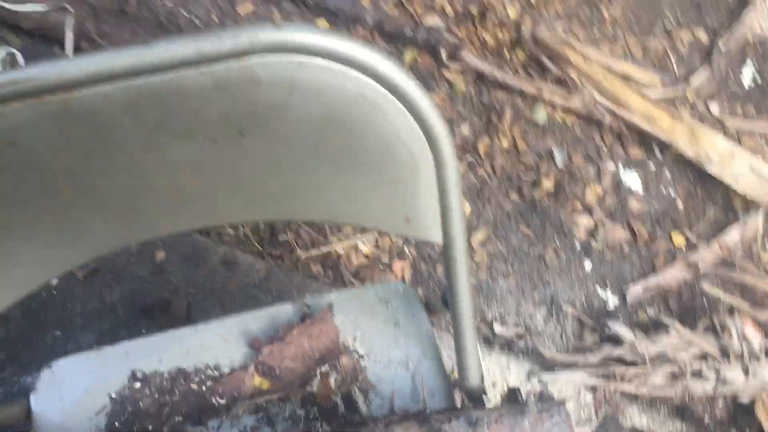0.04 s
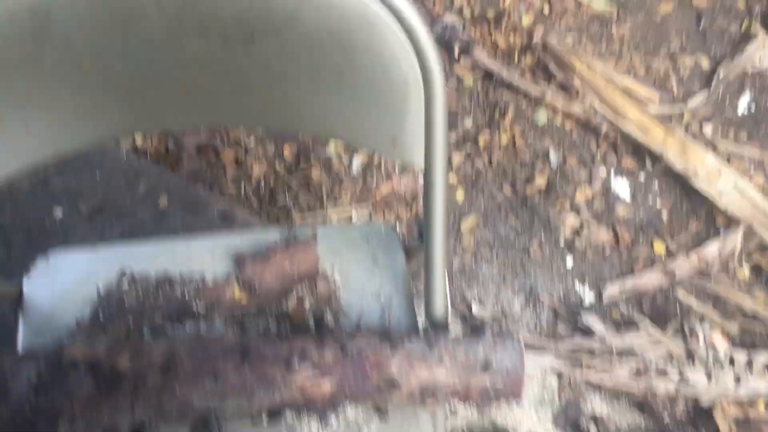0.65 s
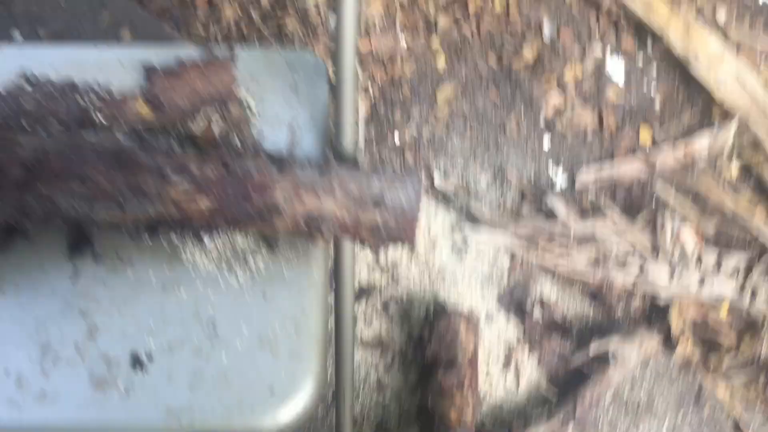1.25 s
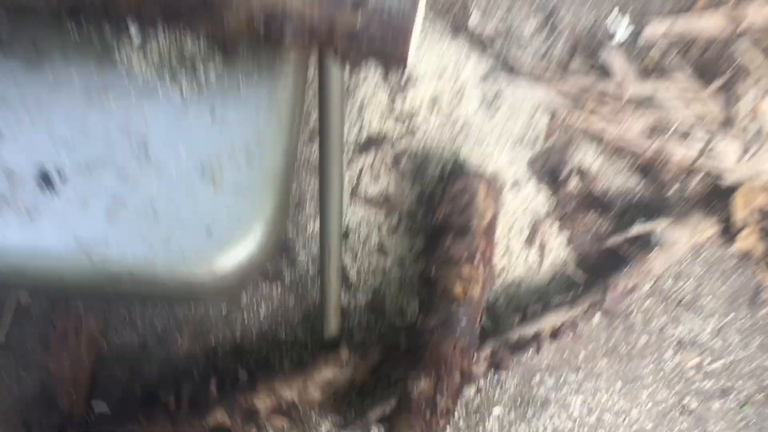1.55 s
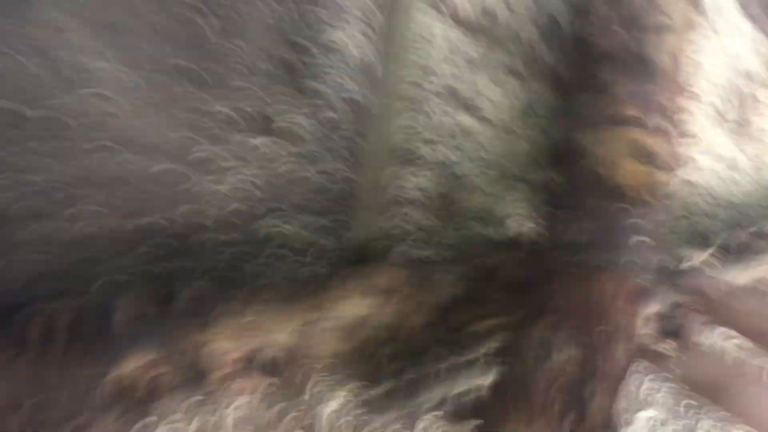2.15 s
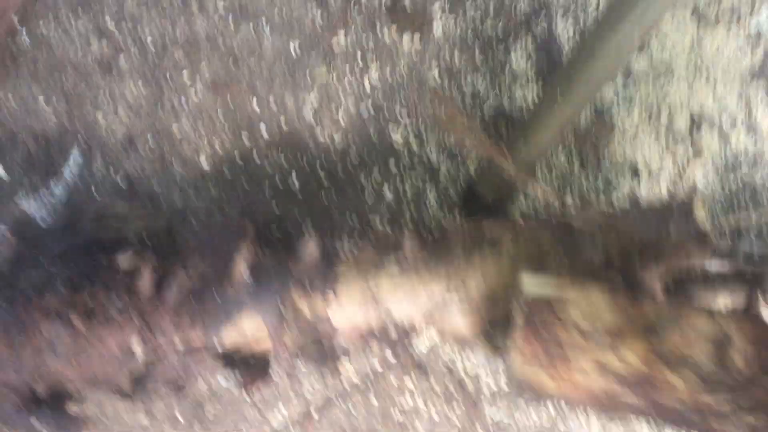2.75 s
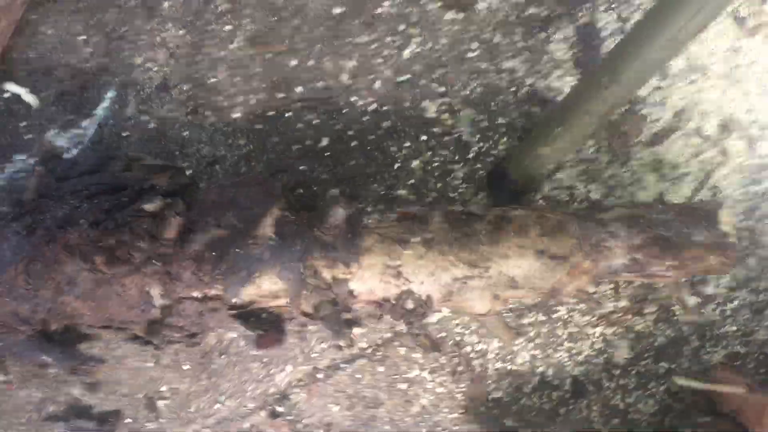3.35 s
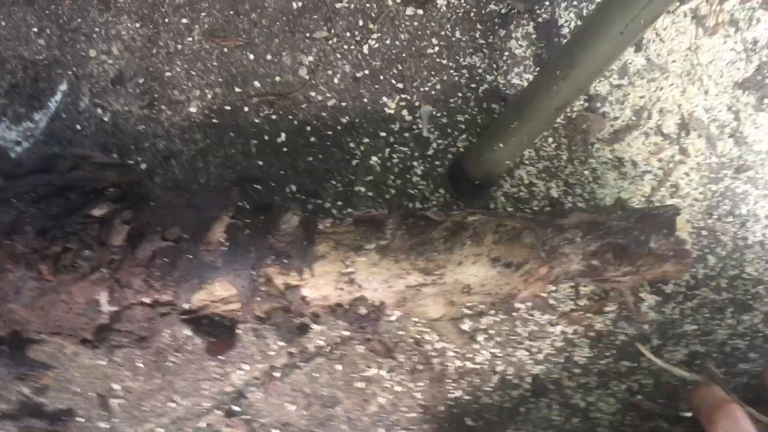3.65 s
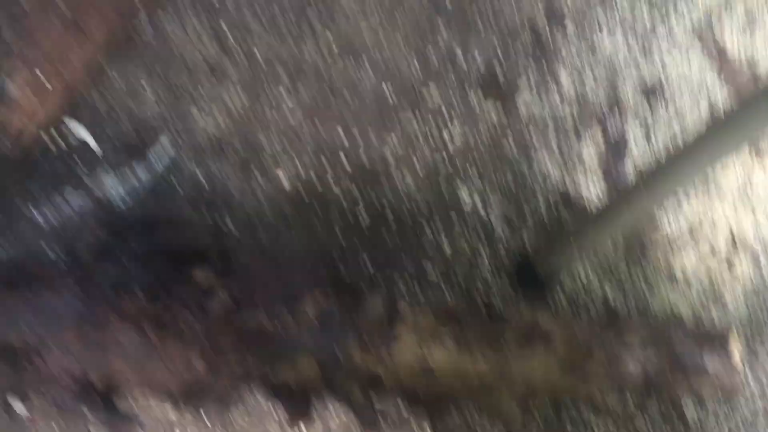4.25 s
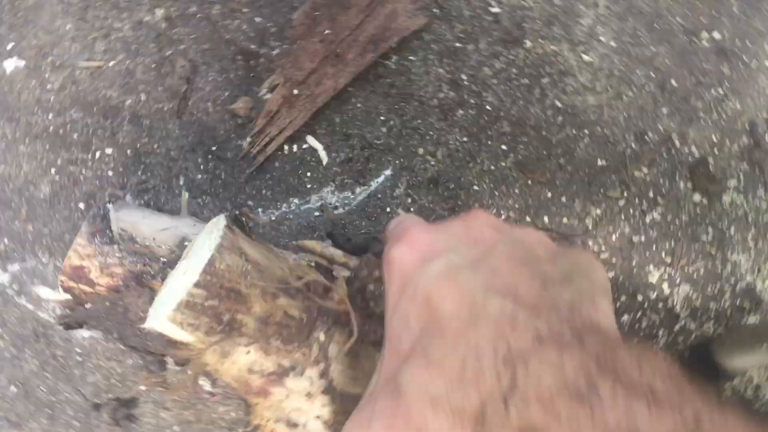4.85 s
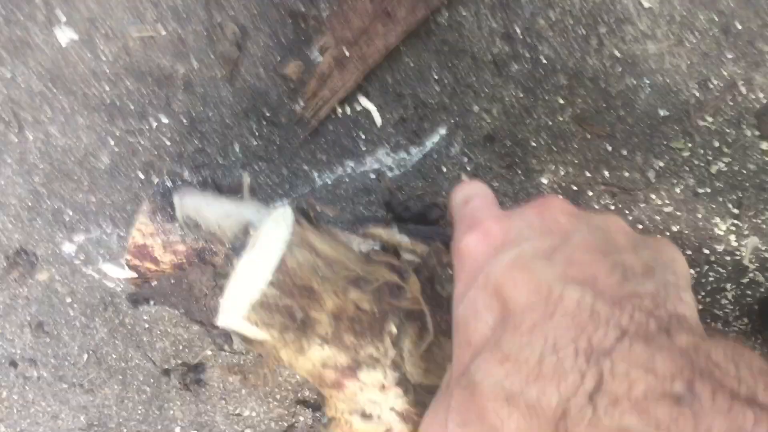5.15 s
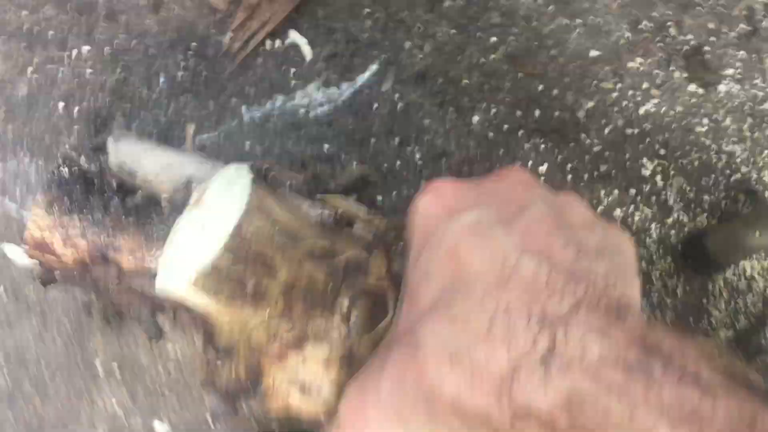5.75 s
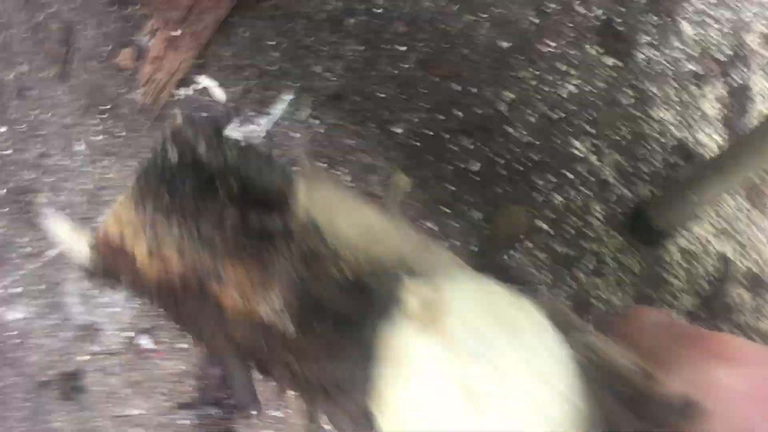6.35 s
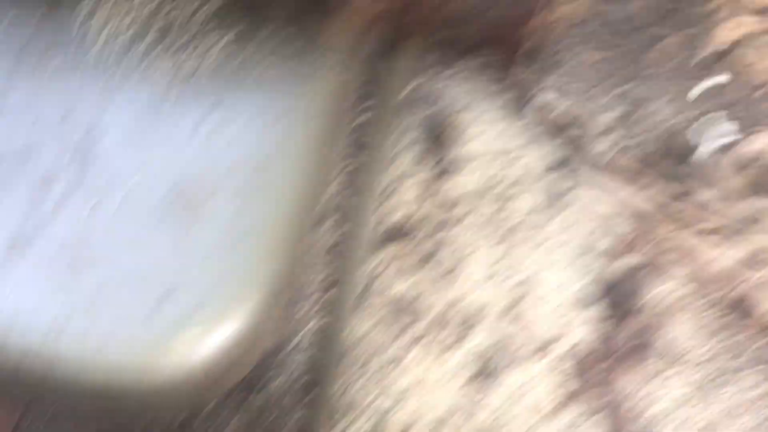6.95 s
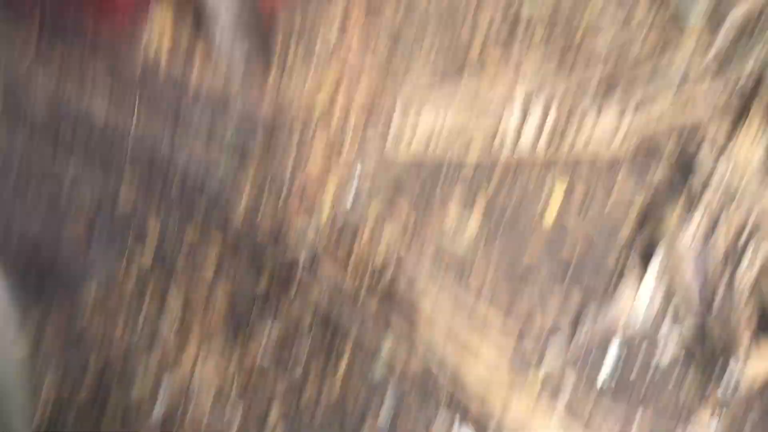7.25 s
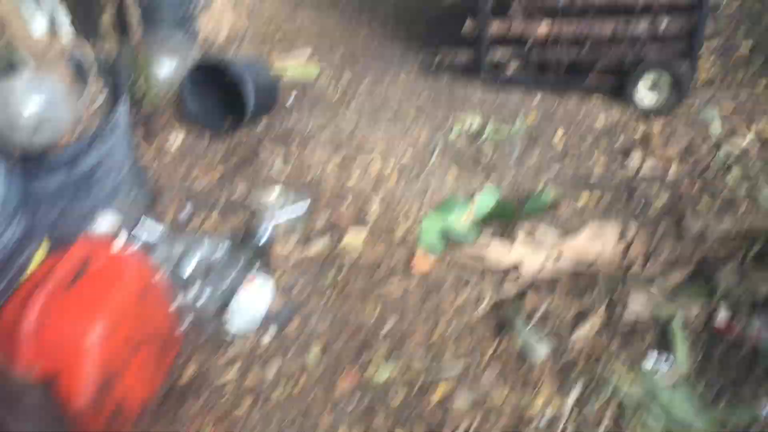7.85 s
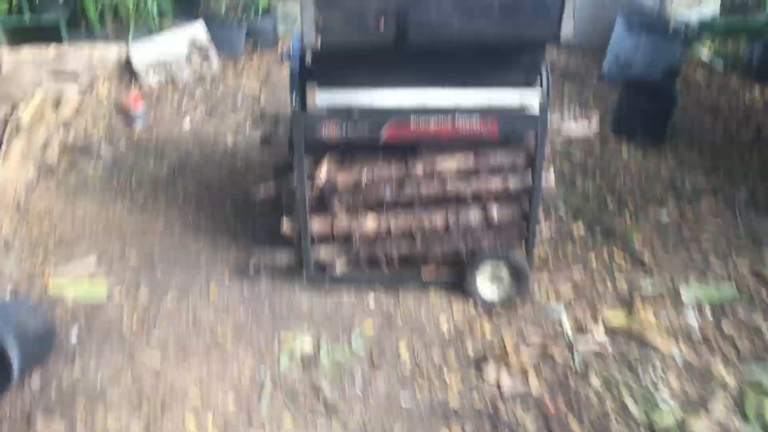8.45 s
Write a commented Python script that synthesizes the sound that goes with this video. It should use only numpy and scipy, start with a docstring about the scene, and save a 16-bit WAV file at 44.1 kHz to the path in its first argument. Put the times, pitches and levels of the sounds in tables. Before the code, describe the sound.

Outdoors over a faint low rumble, shoes scuff on gritty concrete. Close to the microphone, sawn logs are shifted with short, ringing wooden knocks, one of them loud, while bark scrapes and crackles. A log strikes a metal folding chair, which clangs and buzzes briefly. Bark creaks in the grip among lighter knocks, a splinter snaps, and a few faint steps crunch in dry leaves.

```python
"""A faint step in dry leaves, then shoes scuffing gritty concrete, outdoors over a low rumble.
Close to the phone microphone someone shifts sawn logs and picks one up: the wood rings briefly at
each knock, and its bark crackles as it drags and creaks in the grip. The log bumps a metal folding
chair, once loudly, so the steel rings and its loose joints buzz. Last come more steps in leaves."""
import sys
import numpy as np
from scipy import signal
from scipy.fft import rfft, irfft
from scipy.io import wavfile
from scipy.ndimage import uniform_filter1d

SR = 44100
rng = np.random.default_rng(int(sys.argv[2]) if len(sys.argv) > 2 else 0)


def persist_wave(psi):
    """Save psi, clipped to +-1, as 16-bit WAV."""
    counts = np.round(np.clip(psi, -1, 1) * 32767).astype(np.int16)
    wavfile.write(sys.argv[1], SR, np.atleast_2d(counts).T)


N = 375291
T = np.arange(N) / SR


def undb(db):
    """Decibels to gain."""
    return 10 ** (np.asarray(db) / 20)


def unit(x):
    """Scale to rms 1."""
    return x / np.sqrt(np.mean(x ** 2))


def add(out, s, x):
    """Mix x into out from time s on."""
    i = int(round(s * SR))
    x = x[max(-i, 0):max(N - i, 0)]
    out[max(i, 0):max(i, 0) + len(x)] += x


def colour(x, spectrum, tilt_db=0, ripple_db=0):
    """Filter by a spectrum, a tilt per octave and chance resonances; white noise keeps its power."""
    size = 4096
    octave = np.log2(np.maximum(np.arange(size // 2 + 1) * SR / size, 10))
    hz, db = np.transpose(spectrum)
    ripple = ripple_db * np.interp(octave, np.linspace(8, 14, 40), rng.standard_normal(40))
    tilt = tilt_db * np.maximum(octave, np.log2(hz[0]))
    gain = unit(undb(np.interp(octave, np.log2(hz), db) + tilt + ripple))
    cepstrum = irfft(np.log(gain))
    cepstrum[1:size // 2] *= 2  # minimum phase: nothing sounds ahead of an attack
    cepstrum[size // 2 + 1:] = 0
    return signal.fftconvolve(x, irfft(np.exp(rfft(cepstrum))))[:len(x)]


def resonate(x, hz, q):
    """One resonance, applied twice for steep skirts; rms 1."""
    b, a = signal.iirpeak(min(hz, SR / 2.5), max(q, 1), fs=SR)
    return unit(signal.lfilter(b, a, signal.lfilter(b, a, x)))


def wander(rate):
    """Smooth random drift with a spread near 1, taking `rate` new values a second."""
    hold = max(int(SR / rate), 1)
    stairs = np.repeat(rng.standard_normal(N // hold + 1), hold)
    return 1.3 * uniform_filter1d(uniform_filter1d(stairs, hold), hold)[:N]


def grains(n, rate, spread_db):
    """Tiny fractures of uneven size at random moments, `rate` a second; rms 1."""
    draw = rng.random(n) * SR / rate
    breaks = draw < 1
    size = np.full(n, 1e-9)
    size[breaks] = undb(spread_db * np.minimum(-np.log(draw[breaks]), 4))
    return unit(size * rng.standard_normal(n))


def ring(modes, weight, length=1, pitch=1):
    """Sum of decaying modes after a tap; length and pitch scale their decay times and frequencies."""
    hz, db, t60 = np.transpose(modes)
    out = np.zeros(int(.7 * SR))
    for f, gain, decay in zip(hz * pitch, undb(db) * weight, t60 * length):
        t = T[:min(int(2 * decay * SR), len(out))]
        out[:len(t)] += gain * np.exp(-np.log(1000) * t / decay) * np.sin(2 * np.pi * f * t)
    return out


# resonant bands of the rumble: f/Hz, level/dB
RUMBLE_BANDS = [(42, -14.5), (56, -9.5), (70, -1), (85, 2), (106, -7.5), (130, -3), (175, -12.5)]
# low swells as the microphone is swung about: t/s, crest level/dB, half length/s
RUMBLE_SWELLS = [(.85, -62, 0.17), (2.49, -53, 0.13), (3.199, -49.5, .17), (5.68, -53, 0.094),
                 (6.11, -53.5, 0.027), (6.97, -51.5, 0.048)]
def rumble(floor_db=-59.5):
    """A distant rumble whose bands rise and fall independently, with a few broad swells on top."""
    swell_power = sum(undb(db) ** 2 * np.exp(-((T - s) / half) ** 2) for s, db, half in RUMBLE_SWELLS)
    bands = 0
    for hz, db in RUMBLE_BANDS:
        bands += undb(db + 4 * wander(7)) * resonate(rng.standard_normal(N), hz, q=3)
    return np.sqrt(undb(floor_db) ** 2 + swell_power) * unit(bands)


# course of the background hum: t/s, level/dB
HUM_LEVELS = [(0, -78), (.8, -80), (1.6, -57.5), (3.5, -69), (4.5, -56.5), (6.2, -71), (7.7, -80),
              (8.5, -67.5)]
def hum(hz=157):
    """One low outdoor tone, wavering in level and pitch."""
    level_db = np.interp(T, *np.transpose(HUM_LEVELS)) + 2.5 * wander(12)
    phase = 2 * np.pi * np.cumsum(hz + 1.5 * wander(21)) / SR
    return undb(level_db) * np.sin(phase)


# spectrum of the open air: f/Hz, level/dB
AIR_SPECTRUM = [(120, -26), (200, -2.5), (305, -4.5), (328, -10.5), (519, -11), (671, -9.5), (968, -9),
                (1350, -15), (2050, -20.5), (8900, -29), (16000, -34)]
def air(db=-67.5):
    """A soft hiss all round the microphone, drifting with the breeze."""
    breeze_db = .7 * wander(1.2)
    return undb(db + breeze_db) * unit(colour(rng.standard_normal(N), AIR_SPECTRUM))


# spectrum of dry leaves: f/Hz, level/dB
LEAF_SPECTRUM = [(300, -10.5), (900, -1.5), (2300, 1), (4000, -2.5), (7000, -5.5), (10000, -10),
                 (15500, -14)]
def leaf_litter(db=-78.5):
    """Leaves on the ground nearby rustle faintly now and then."""
    stirring = undb(4 * wander(9))
    ticks = grains(N, rate=1600, spread_db=1.26) * stirring
    return undb(db) * unit(colour(ticks, LEAF_SPECTRUM, tilt_db=-2.5))


def footfalls(steps, spectrum, tilt_db, rate, spread_db):
    """A sole slides over many small grains; the rush swells and fades, differently at each step."""
    out, lead_s = np.zeros(N), .2
    t = T[:int(2 * lead_s * SR)] - lead_s
    for s, db, half_ms in steps:
        age = t * 1000 / half_ms
        trail = undb(-19.5) * np.exp(-np.maximum(age - .6, 2 * (.6 - age)) / 2)
        pressure = np.exp(-.74 * age ** 2) + trail
        rush = grains(len(t), rate, spread_db) * pressure
        add(out, s - lead_s, undb(db) * colour(rush, spectrum, tilt_db, ripple_db=2))
    return out


# steps in dry leaves: t/s, crest level/dB, half length/ms
LEAF_STEPS = [(.012, -52, 26.5), (7.828, -52, 8), (7.885, -55, 49), (7.968, -54, 66), (8.11, -61, 86),
              (8.496, -45.5, 11)]
def leaf_steps():
    """Dry leaves give way in fits under a shoe."""
    crunch = undb(2.5 * wander(110))
    return crunch * footfalls(LEAF_STEPS, LEAF_SPECTRUM, tilt_db=1.7, rate=5000, spread_db=-1.5)


# spectrum of grit on concrete: f/Hz, level/dB
GRIT_SPECTRUM = [(120, -15), (200, -7), (310, -4.5), (373, -9.5), (569, -1.5), (867, -9), (1000, -3.5),
                 (2020, -7), (2400, -10.5), (3430, -16.5), (8420, -31), (16000, -47.5)]
# scuffs round the chair: t/s, crest level/dB, half length/ms
SHOE_SCUFFS = [(.612, -42, 19.8), (.950, -56, 14.5), (1.388, -43.5, 10.2), (1.406, -33, 10.6),
               (1.431, -36, 15.2), (1.615, -67.5, 55), (1.757, -45, 15.6), (6.95, -67.5, 30),
               (7.50, -59, 9.3)]
def shoe_scuffs():
    """Shoes grind grit against the concrete, close by."""
    return footfalls(SHOE_SCUFFS, GRIT_SPECTRUM, tilt_db=3, rate=14000, spread_db=2.5)


# creaks as the log is gripped and turned: t/s, crest level/dB, resonance f/Hz
BARK_CREAKS = [(4.367, -55.5, 2640), (4.427, -55.5, 2120), (4.905, -48, 1830), (5.0, -52.5, 1690),
               (5.206, -54.5, 2044), (5.317, -50, 2090), (5.398, -37, 2070), (5.476, -46.5, 1630),
               (5.537, -42, 1670), (5.589, -46, 3240)]
def bark_creaks(half_s=.0087):
    """Short runs of stick and slip, each sounding one resonance of the bark."""
    out, lead_s = np.zeros(N), .1
    t = T[:int(2 * lead_s * SR)] - lead_s
    for s, db, hz in BARK_CREAKS:
        slips = resonate(grains(len(t), rate=770, spread_db=0), hz, q=2.6)
        add(out, s - lead_s, undb(db) * slips * np.exp(-(t / half_s) ** 2 / 2))
    return out


def fractures(cracks, spectrum):
    """Each crack is a quick cluster of breaking fibres with its own resonances, then trailing crumbs."""
    out, lead_s = np.zeros(N), .02
    t = T[:SR // 4] - lead_s
    crumbs = undb(-23) * (t > 0) * np.exp(-np.abs(t) / .012)
    for s, db, decay_ms, tilt_db in cracks:
        age = np.where(t < 0, -t * 2 / min(decay_ms, 5), t / decay_ms) * 1000
        fibres = grains(len(t), rate=26000, spread_db=4.5) * (np.exp(-age) + crumbs)
        add(out, s - lead_s, undb(db) * colour(fibres, spectrum, tilt_db, ripple_db=3))
    return out


# spectrum of dry flakes breaking: f/Hz, level/dB
FLAKE_SPECTRUM = [(300, -23), (900, -20.5), (2000, -3), (3300, -3), (4800, -4.5), (6500, -1.5), (9800, -3),
                  (12500, -5), (16000, -5)]
# cracks of bark and dry leaves: t/s, crest level/dB, decay/ms, tilt/(dB per octave)
SHARP_CRACKS = [(2.426, -35.5, 3.5, -6.5), (2.486, -31, 1.7, 11.5), (2.494, -39, 6.6, -1.5),
                (2.803, -42, 2, -6.5), (2.834, -24.5, 1.7, -3.5), (2.886, -35, 3.5, -6.5),
                (2.954, -30.5, 12.8, -4), (3.003, -35, 7.2, -4.5), (3.083, -38.5, 3.7, -1),
                (3.236, -39.5, 24, -4), (3.27, -32.5, 5.9, -10), (3.416, -33, 4.2, -9),
                (4.045, -45, 6.4, 2), (4.066, -29.5, 1.75, -3), (4.085, -38, 2.3, -3),
                (4.140, -38, 4.9, -7), (4.188, -41.5, 3.8, -4), (4.412, -42, 1.8, 5.5),
                (4.544, -34.5, 5, 1), (4.616, -31.5, 56, -6.5), (4.699, -29.5, 5.8, -4.5),
                (4.806, -37, 8.7, -7.5), (5.2567, -36.5, 2.3, 0.5), (5.351, -40, 7.9, -4.5),
                (5.386, -41, 12.5, -3), (5.536, -37.5, 24, -2), (6.128, -39.5, 7, -4),
                (6.477, -56, 2.1, -4), (6.742, -56.5, 1.8, -2.5), (7.811, -46.5, 1.4, -4),
                (8.082, -45.5, 6.8, -6), (8.251, -55, 1.34, -1)]
def sharp_cracks():
    """Close, sharp cracks of bark and, near the end, of dry leaves underfoot."""
    return fractures(SHARP_CRACKS, FLAKE_SPECTRUM)


# spectrum of a breaking splinter: f/Hz, level/dB
SPLINTER_SPECTRUM = [(500, -16), (2200, 1.5), (3100, 1), (3700, -7.5), (4700, -10), (5500, -8.5),
                     (6600, 0.5), (8000, -5), (10200, -8), (11300, 8), (13200, 3.5), (16000, -18.5)]
# snaps: t/s, crest level/dB, decay/ms, tilt/(dB per octave)
SPLINTER_SNAPS = [(2.8335, -23.5, 0.84, 1.5), (6.1405, -22, 3.9, 0), (6.146, -26, 2.15, -1)]
def splinter_snaps():
    """Splinters of dry wood break with a short, bright snap."""
    return fractures(SPLINTER_SNAPS, SPLINTER_SPECTRUM)


def bark_crackle():
    """Flakes of twelve sizes, large to small, crackle in their own short bursts at their own pitch."""
    out = 0
    for hz in np.geomspace(910, 14500, num=12):
        bursts = undb(4.5 * wander(70))
        out += np.sqrt(hz) * resonate(grains(N, rate=2000, spread_db=3.5) * bursts, hz, q=3.5)
    return colour(out, FLAKE_SPECTRUM)


# modes of a sawn log: f/Hz, level/dB, t60/s
LOG_MODES = [(103.5, -10, 0.52), (207, -19, 0.14), (268, -7, 0.056), (441, -17.5, 0.037),
             (502, -6.5, 0.039), (575, -1.5, .022), (775, 3, 0.024), (836, -5, 0.071), (906, -13.5, 0.023),
             (1252, -4.5, .028), (1350, -6.5, 0.017), (1860, -13.5, .025), (1934, 0, 0.033),
             (1960, -21, 0.044), (2335, -33.5, 0.022), (3040, -15, .032)]
LOG_HZ = np.transpose(LOG_MODES)[0]
def log_scrape(slips):
    """Small hard grains slip under the log and ring it, favouring its upper modes."""
    wood = ring(LOG_MODES, weight=1 / (1 + (2700 / LOG_HZ) ** 2), length=.8)
    return signal.fftconvolve(slips, wood / np.linalg.norm(wood))[:N]


def shove(length_s, attack_s, sag_db_per_s=25.5, release_s=.011):
    """The force of one shove takes hold quickly, weakens as it goes on and stops."""
    t = T[:SR] - attack_s
    after = np.maximum(t - length_s, 0)
    attack = np.clip(1 + t / attack_s, 0, 1) ** 2
    sag = undb(-sag_db_per_s * np.maximum(t, 0))
    settling = undb(-15) * np.exp(-after / .06)  # loose bark goes on settling
    return attack * sag * np.maximum(np.exp(-after / release_s), settling)


# shoves that drag the log: t/s, length/s, crackle level/dB, ring level/dB
LOG_SHOVES = [(2.364, 0.037, -45.5, -53.5), (2.415, 0.13, -56.5, -54), (2.601, 0.039, -51.5, -63),
              (2.671, 0.089, -64.5, -72), (2.821, 0.11, -54.5, -52), (3.018, 0.098, -58, -67.5),
              (3.137, 0.053, -48.5, -62), (3.204, 0.14, -49.5, -53), (3.355, 0.025, -48.5, -57),
              (3.425, .13, -57, -69), (3.589, .16, -63.5, -71.5), (3.789, 0.048, -59.5, -65),
              (3.898, 0.071, -61, -65), (4.154, 0.099, -53, -79), (4.515, 0.075, -50.5, -57),
              (4.857, 0.17, -60.5, -57.5), (5.237, 0.2, -58, -61.5), (5.466, 0.15, -54, -59),
              (5.575, 0.14, -57.5, -50), (5.71, 0.12, -62.5, -62), (5.885, 0.047, -61.5, -65.5),
              (5.967, 0.067, -60, -60), (6.07, .05, -66, -72)]
def log_drag(attack_s=.0066):
    """Bark catches and slips on the concrete: flakes crackle, lone crumbs snap and the log rings."""
    bark_gain, ring_gain = np.zeros(N), np.zeros(N)
    for s, length_s, bark_db, ring_db in LOG_SHOVES:
        force = shove(length_s, attack_s)
        add(bark_gain, s - attack_s, undb(bark_db) * force)
        add(ring_gain, s - attack_s, undb(ring_db) * force)
    catches = undb(2.5 * wander(70))
    crumbs = undb(-10.5) * colour(grains(N, rate=90, spread_db=.5), FLAKE_SPECTRUM)
    bark = unit(bark_crackle() * catches) + crumbs
    slips = unit(grains(N, rate=900, spread_db=1.5) * catches)
    return bark * bark_gain + log_scrape(slips * ring_gain)


# modes of the chair's sheet seat and tubes: f/Hz, level/dB, t60/s
CHAIR_MODES = [(150.3, -20, 0.58), (199, -4.5, 0.072), (251.2, 2, 0.2), (323, 4, 0.2), (431, -6.5, 0.17),
               (497, -15.5, 0.87), (646, -10.5, .2), (770, -23.5, 0.23), (822, 5, 0.3), (883, -6, .3),
               (988, -17.5, 0.87), (1147, -5.5, 0.39), (1207, -17.5, 0.72), (1374, -10.5, 0.45),
               (1534, -1, 0.25), (1555, -14.5, 0.57), (1637, -10.5, 0.53), (1737, -4, .22), (1816, 0, .25),
               (1857, -13, 0.57), (1880, -10, 0.29), (2208, -15, 0.77), (2327, -10, .28), (2620, -8, 0.22),
               (2760, -13.5, 0.14), (3380, -17.5, 0.2)]
# blows of the log: t/s, peak ring level/dB, contact corner f/Hz, relative buzz level/dB before trim
CHAIR_BUMPS = [(3.083, -36, 420, 17.5), (3.139, -39, 398, 10), (4.6140, -8.5, 3490, 2),
               (4.698, -33, 3500, 10)]
def chair_bumps(buzz_trim_db=-9, buzz_rise_s=.003):
    """The steel rings after a blow while its loose joints start to buzz and die away."""
    out, hz = np.zeros(N), np.transpose(CHAIR_MODES)[0]
    swing = (-1) ** np.arange(len(hz))  # neighbouring modes of a sheet swing opposite ways
    for s, db, corner_hz, buzz_db in CHAIR_BUMPS:
        steel = ring(CHAIR_MODES, weight=swing / (1 + (hz / corner_hz) ** 2))
        steel /= np.abs(steel).max()
        t = T[:len(steel)]
        rise = 1 - np.exp(-t / buzz_rise_s)
        settle = np.exp(-t / .032) + undb(-28) * np.exp(-t / .15)
        buzz = joint_buzz(rise * settle, corner_hz)
        add(out, s, undb(db) * (steel + undb(buzz_db + buzz_trim_db) * buzz))
    return out


# spectrum of the chair's loose joints: f/Hz, level/dB
BUZZ_SPECTRUM = [(90, -17.5), (200, -2), (330, -5.5), (700, -2), (1020, -5), (1700, -4), (2500, -15),
                 (3600, -27.5), (8000, -16.5)]
def joint_buzz(envelope, corner_hz):
    """Loose joints chatter in dense tiny impacts, rolled off above the corner of the blow."""
    chatter = grains(len(envelope), rate=12000, spread_db=5) * envelope
    band = signal.butter(2, [130, corner_hz], "band", fs=SR, output="sos")
    return signal.sosfilt(band, colour(chatter, BUZZ_SPECTRUM))


# knocks on the log, close up: t/s, peak level/dB, centre of the excited band f/Hz, ring length/factor
LOG_KNOCKS = [(2.425, -45, 900, 0.64), (2.833, -32.5, 2020, 1.3), (2.894, -32, 1460, 1.8),
              (3.002, -5, 744, 0.84), (3.083, -22.5, 2250, 0.84), (3.139, -39.5, 1510, 0.65),
              (3.268, -27, 1850, 1.4), (3.275, -36.5, 110, 0.52), (3.4148, -26.5, 685, 0.11),
              (4.135, -45, 584, 1.1), (4.547, -27, 890, .5), (5.395, -29.5, 2120, 0.74),
              (5.538, -33.5, 1310, 1.1), (5.608, -25, 560, 1.1), (5.666, -39.5, 1490, 1.14),
              (5.806, -41.5, 2390, .9), (5.911, -35.5, 1680, 1.1), (5.992, -39.5, 960, 2.1),
              (6.028, -37.5, 1900, 0.97), (6.140, -28, 1960, 1.37), (8.152, -46, 806, 1.24)]
def log_knocks(full_scale_octaves=2.2, halving_db=31.5):
    """Where and how hard the log is met picks its modes; hand and ground damp and detune them."""
    out = np.zeros(N)
    for s, db, centre_hz, length in LOG_KNOCKS:
        octaves = full_scale_octaves * 2 ** (db / halving_db)  # a harder knock excites a wider band
        weight = 1 / (1 + (np.log2(LOG_HZ / centre_hz) / octaves) ** 4)
        wood = ring(LOG_MODES, weight, length, pitch=1 + .0035 * rng.standard_normal())
        wood *= 1 - np.exp(-T[:len(wood)] / .0025)  # bark cushions the contact, so the ring builds up
        add(out, s, wood * undb(db) / np.abs(wood).max())
    return out


def yard_echoes(x, db, t60):
    """The direct sound plus weak scattered echoes from the ground and things standing about."""
    t = T[:SR // 2]
    tail = rng.standard_normal(len(t)) * np.exp(-np.log(1000) * t / t60) * (t > .006)
    tail = signal.sosfilt(signal.butter(1, 6000, fs=SR, output="sos"), tail)
    return x + undb(db) * signal.fftconvolve(x, tail / np.linalg.norm(tail))[:N]


def scene():
    """Feet, wood and chair close to one microphone in an open yard, the rumble far behind them."""
    feet = leaf_steps() + shoe_scuffs()
    blows = log_knocks() + chair_bumps()
    crackles = sharp_cracks() + splinter_snaps() + bark_creaks() + log_drag()
    near = yard_echoes(feet + blows + crackles + leaf_litter(), db=-21.5, t60=.19)
    return (near + rumble() + hum() + air())[None]


def record(dry):
    """The phone's microphone thins the deepest bass and cuts the top."""
    low_cut = signal.butter(3, 45, "high", fs=SR, output="sos")
    top_cut = signal.ellip(10, .2, 80, 16000, fs=SR, output="sos")
    return signal.sosfilt(top_cut, signal.sosfilt(low_cut, dry))


dry = scene()
out = record(dry)
persist_wave(out)
```